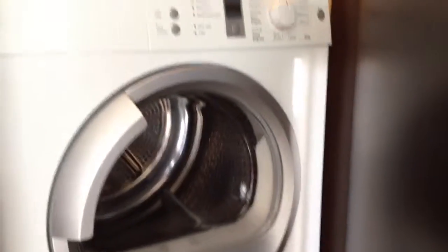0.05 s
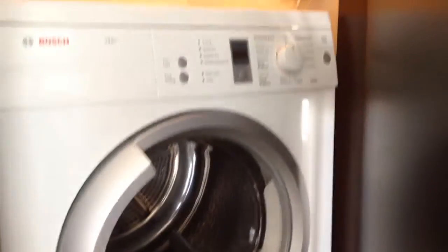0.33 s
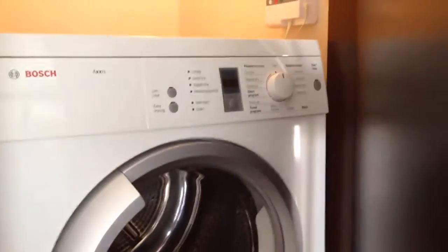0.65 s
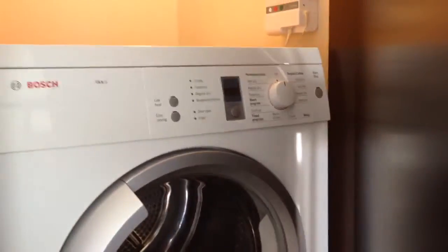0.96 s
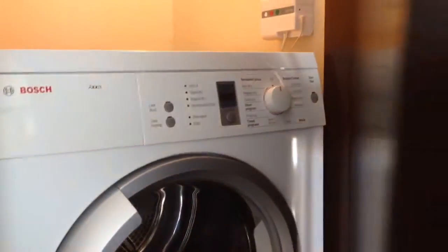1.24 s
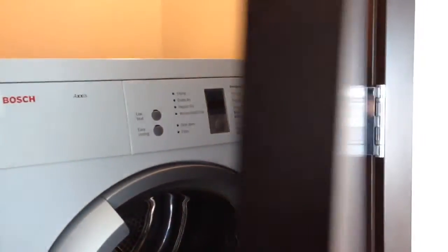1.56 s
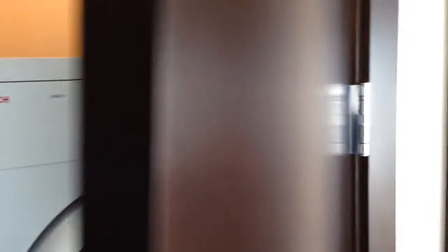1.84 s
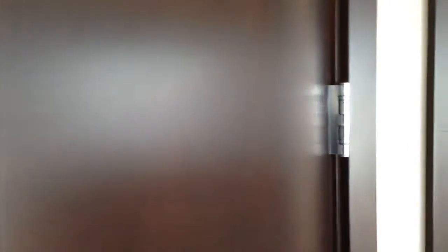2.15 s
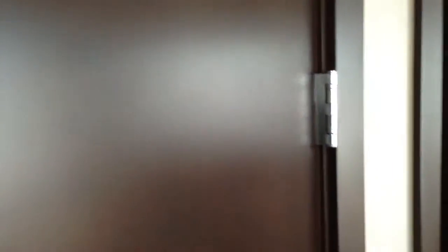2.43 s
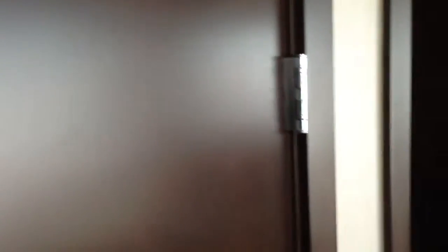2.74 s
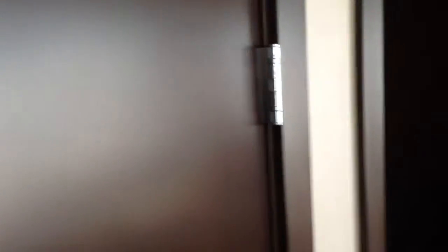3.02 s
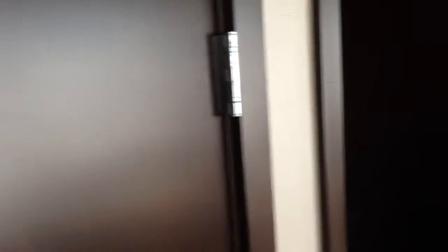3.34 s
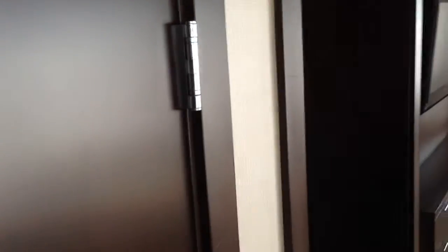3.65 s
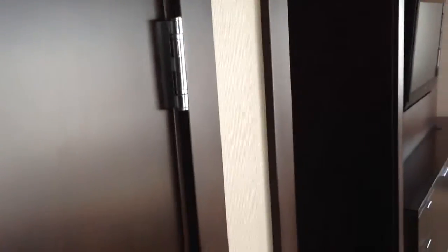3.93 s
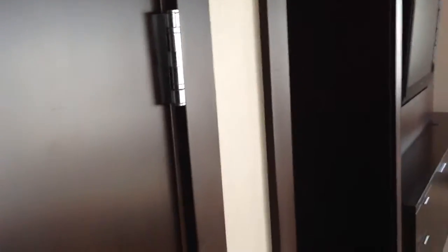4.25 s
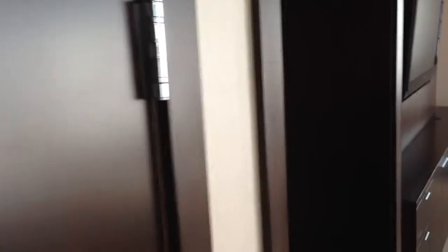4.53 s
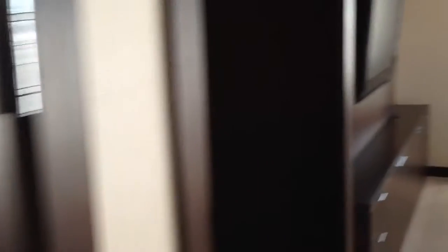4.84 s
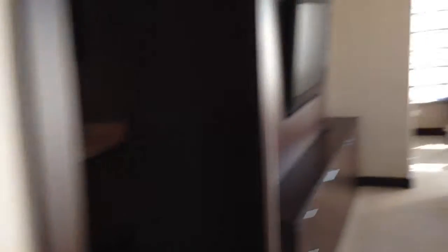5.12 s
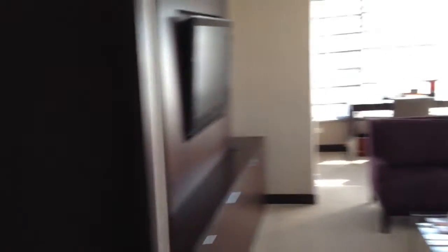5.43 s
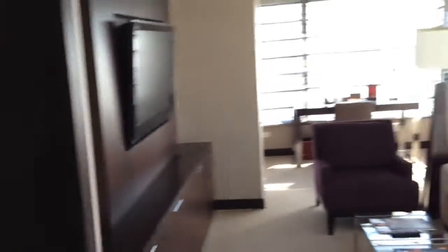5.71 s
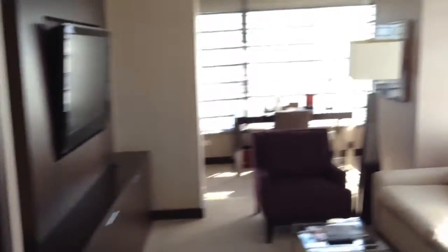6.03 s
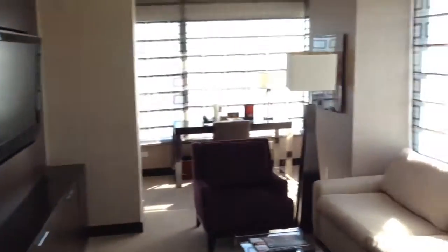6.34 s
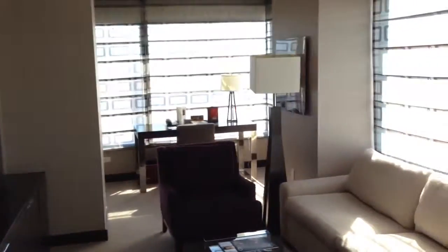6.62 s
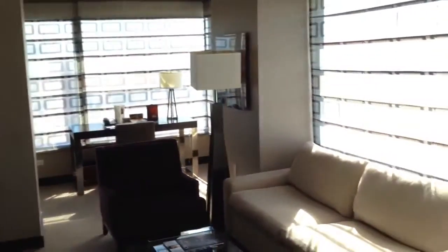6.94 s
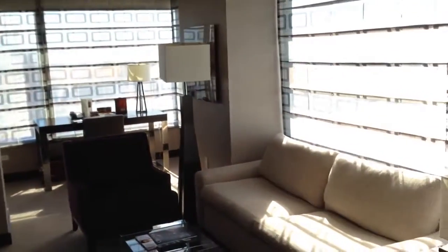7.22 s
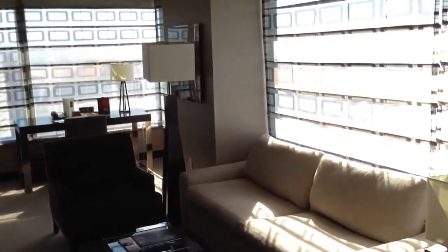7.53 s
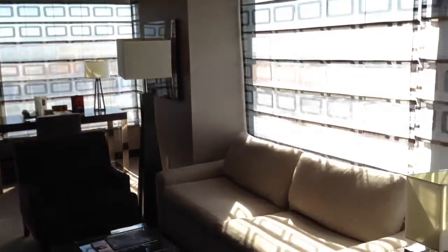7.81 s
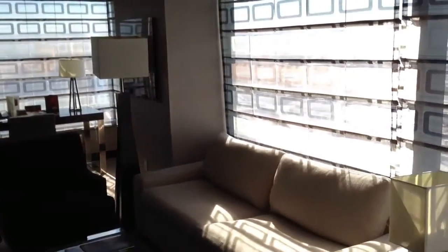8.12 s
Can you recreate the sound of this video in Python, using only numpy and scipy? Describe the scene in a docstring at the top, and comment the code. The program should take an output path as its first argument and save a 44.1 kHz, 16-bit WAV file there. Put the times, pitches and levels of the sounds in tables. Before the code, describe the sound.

A low ventilation rumble with faint hiss fills a quiet, carpeted room. About halfway through, a wooden closet door close to the microphone knocks lightly against its metal catch. After a faint rub, the catch snaps in with a sharp click, and the door thuds shut at once with a deep boom and a brief rattle. The room rings briefly, and only the rumble remains.

```python
"""Closet door pushed shut

A wooden door closes in a quiet, carpeted room with rumbling ventilation and a hissing vent.
It knocks once against its metal catch and rubs over it; the catch snaps in with a sharp click,
echoed by a nearby surface. The leaf thuds into the frame, squeezes the closet's air into a low boom
and rattles briefly. The room rings after each blow."""
import sys
import numpy as np
from scipy import signal
from scipy.fft import rfft, irfft
from scipy.io import wavfile
from scipy.ndimage import uniform_filter1d

SR = 44100
rng = np.random.default_rng(int(sys.argv[2]) if len(sys.argv) > 2 else 0)


def put_to_file(sound):
    """Save the sound as 16-bit audio at rate SR, in the file named by the first command-line argument."""
    columns = np.atleast_2d(sound).T  # one column per channel
    safe = np.clip(columns, -1, 1)
    whole_steps = np.round(safe * 32767)
    wavfile.write(sys.argv[1], SR, whole_steps.astype(np.int16))


N = 364707

# blows on the door leaf: start_s, thump_db, thump_centre_hz, clack_db
BLOWS = [(3.8009, -6, 192, -18), (3.811, -13, 338, -18.5), (3.828, -9, 167, -27), (4.590, -12.5, 316, -15),
         (4.599, -2, 98, -17), (4.606, -20, 228, -11.5), (4.637, -4, 102, -20), (4.655, -20, 292, -31)]


def gain_of(db):
    """Decibels to amplitude."""
    return 10 ** (np.asarray(db) / 20)


def unit(x):
    """Scales to unit energy."""
    return x / np.sqrt(np.sum(x ** 2) + 1e-20)


def read(points, hz):
    """Interpolates (freq_hz, value) points on a log frequency axis."""
    freq_hz, value = np.transpose(points)
    return np.interp(np.log(hz + 1), np.log(freq_hz + 1), value)


def add(mix, start_s, sound):
    """Mixes a sound in at start_s."""
    part = mix[round(start_s * SR):][:len(sound)]
    part += sound[:len(part)]


def noise(spectrum):
    """Steady unit-rms noise coloured by (freq_hz, relative_db) points."""
    colour = gain_of(read(spectrum, np.fft.rfftfreq(N, 1 / SR)))
    return unit(irfft(rfft(rng.standard_normal(N)) * colour, N)) * np.sqrt(N)


def modes(table):
    """One second of decaying sines struck together, unit energy."""
    t = np.arange(SR) / SR
    return unit(sum(gain_of(db - 60 * t / t60_s) * np.sin(2 * np.pi * hz * t) for hz, db, t60_s in table))


def crack(spectrum, t60_s, tilt_db_per_oct=0, size=4096):
    """A contact: a fast-decaying burst of dense vibration, coloured at minimum phase."""
    hz = np.fft.rfftfreq(size, 1 / SR)
    burst = rfft(rng.standard_normal(size) * gain_of(-60 * np.arange(size) / SR / t60_s))
    broad_shape = np.sqrt(uniform_filter1d(abs(burst) ** 2, size=36))
    colour = gain_of(read(spectrum, hz) + tilt_db_per_oct * np.log2(hz + 100))
    log_gain = np.log(colour / broad_shape)  # only the fine ripple stays random
    mirrored = np.r_[log_gain, log_gain[-2:0:-1]]
    minimum_phase = np.exp(np.conj(signal.hilbert(mirrored)))
    return unit(irfft(burst * minimum_phase[:len(hz)]))


def move(start_s, length_s):
    """Progress of a microphone movement, 0 to 1."""
    return np.clip((np.arange(N) / SR - start_s) / length_s, 0, 1)


def room(x, rise_s, spacing=16):
    """Dense reflections of random sign build up, then decay band by band."""
    # room decay: freq_hz, t60_s
    decay = [(60, 0.38), (200, 0.67), (600, 0.61), (1500, 0.52), (2500, 0.39), (4000, 0.38), (7000, 0.24),
             (14000, 0.33)]
    taps = np.zeros(SR)
    slots = np.arange(0, SR - spacing, spacing)
    taps[slots + rng.integers(0, spacing, len(slots))] = rng.choice([-1, 1], len(slots))
    hz, t, bands = signal.stft(taps, SR, nperseg=256)
    tail = signal.istft(bands * gain_of(-60 * t / read(decay, hz)[:, None]), SR)[1]
    tail *= 1 - np.exp(-(np.arange(len(tail)) / SR / rise_s) ** 2)
    return signal.fftconvolve(x, unit(tail))[:N]


def ventilation(rumble_db=-56.5, hiss_db=-68, waver_db=0.72, wall_db=-4, wall_hz=200):
    """Air rumbles in the ducts and drives the room's standing waves, over thin microphone hiss."""
    # duct rumble spectrum: freq_hz, relative_db
    duct = [(12, -39), (22, -19), (39, -11.5), (58, -0.5), (75, -4.5), (110, 0.5), (170, -3.5), (240, -3.5),
            (310, -10), (420, -13.5), (520, -16), (730, -23.5), (1550, -28.5), (2700, -38.5), (6000, -54)]
    # standing waves: pitch_hz, width_hz, doorway_db, step_back_db
    standing = [(165, 18, -77, -57.5), (215.4, 11, -60, -62.5), (376.7, 59.5, -64.5, -65)]
    # microphone hiss spectrum: freq_hz, relative_db
    hiss = [(100, -1.5), (2000, 2.5), (2750, 0), (3600, 3.5), (4900, 2), (8000, 1), (15000, -0.5)]
    stepped = move(start_s=2.8, length_s=0.43)  # one step back from the closet doorway
    turned = move(start_s=5.23, length_s=0.42)  # from the wall to the open room
    waver = noise([(0, 0), (3, 0), (12, -30), (60, -120)])
    air = gain_of(rumble_db) * noise(duct)
    for hz, width_hz, doorway_db, step_back_db in standing:
        wave = signal.lfilter(*signal.iirpeak(hz, hz / width_hz, fs=SR), noise(duct))
        turn_db = wall_db * min(wall_hz / hz, 1) ** 2  # low waves weaken away from the wall
        level_db = doorway_db + (step_back_db - doorway_db) * stepped + turn_db * turned
        air += gain_of(level_db) * unit(wave) * np.sqrt(N)
    return gain_of(waver_db * waver) * air + gain_of(hiss_db) * noise(hiss)


def vent(start_db=-84, rise_db_per_s=0.8):
    """Air hisses through the grille, growing steadily as the microphone comes round to the room."""
    level_db = start_db + rise_db_per_s * np.arange(N) / SR
    hiss = noise([(1500, -26), (2800, -10.5), (3500, -1.5), (4100, -4.5), (5200, -17), (10000, -38)])
    return gain_of(level_db) * hiss


def catch(spring_start_s=3.8, spring_db=-29):
    """The sprung catch snaps: hard tick, short metallic clack, faint ring of the fittings, early echo."""
    # catch clicks, and an early echo of the snap off a nearby surface (4.467 s):
    # start_s, clack_db, tick_db, relative_tilt_db_per_oct
    clicks_and_echo = [(3.795, -27, -45, -2), (3.7995, -17.5, -27, 2.5), (4.4434, -6, -5, -3),
                       (4.4444, -30, -6, 2), (4.467, -18, -37, -6), (4.577, -25, -46, -3),
                       (4.5992, -18.5, -35, 1), (4.63, -34, -47, 4), (4.639, -24, -47, 1),
                       (4.655, -32, -41, 7)]
    # metal click spectrum: freq_hz, relative_db
    metal = [(100, -38), (500, -16), (1050, -14), (1400, -2), (1850, -6.5), (2250, 4), (2800, -6),
             (3500, -1.5), (4600, -4), (6300, -10), (8000, -22.5), (11000, -35), (15000, -35)]
    # damped modes of the catch in the wood: pitch_hz, relative_db, t60_s
    catch_modes = [(720, -14, .09), (1330, -7, .05), (1680, -6, .05), (2090, -1, .045), (2370, -2, .035),
                   (2830, 2, .018), (3480, -1, .022), (4170, -5, .02), (4600, -1, .022), (5100, -7, .02),
                   (5620, -7, .022), (6250, -8, .02), (7200, -13, .015)]
    # ringing of catch and hinges: pitch_hz, relative_db, t60_s
    ring_modes = [(770, -7, .4), (958, -7, .4), (1292, -2, .5), (1362, -2, .4), (1396, -2, .4),
                  (1691, 0, .45), (2068, -1, .4), (2296, 0, .3), (2435, 1, .27), (2929, -1, .22),
                  (3393, 1, .25), (3546, 1, .25), (3774, 2, .15)]
    # the spring, singing as it is loaded: pitch_hz, relative_db, t60_s
    spring_modes = [(1400, 6, 1.1), (1720, 0, 1.8), (2100, 4, 1.2), (2350, -3, 1.6)]
    out, clack, ring = np.zeros(N), modes(catch_modes), modes(ring_modes)
    for start_s, clack_db, tick_db, tilt in clicks_and_echo:
        add(out, start_s, gain_of(tick_db) * crack(metal, t60_s=0.0086, tilt_db_per_oct=tilt - 1.0))
        add(out, start_s, gain_of(clack_db - 0.5) * crack(metal, t60_s=0.029, tilt_db_per_oct=tilt - 1.5))
        add(out, start_s, gain_of(clack_db - 7.5) * clack)
    out += gain_of(-4) * room(out, rise_s=0.0055)
    for start_s, clack_db, _, _ in clicks_and_echo:
        add(out, start_s, gain_of(clack_db - 10) * ring)
    add(out, spring_start_s, gain_of(spring_db) * modes(spring_modes))
    return signal.lfilter(*signal.butter(2, 330, "highpass", fs=SR), out)  # small parts radiate no bass


def booms(swell_s=0.0037):
    """Air squeezed in the closet as the leaf stops swells into a deep, decaying tone."""
    # closet air swings: start_s, pitch_hz, level_db, t60_s
    swings = [(3.800, 49, -8, .28), (4.603, 62.5, .5, .47)]
    out = np.zeros(N)
    swell = 1 - np.exp(-np.arange(SR) / SR / swell_s)
    for start_s, hz, level_db, t60_s in swings:
        add(out, start_s, gain_of(level_db) * unit(modes([(hz, 0, t60_s)]) * swell))
    return out


def thumps():
    """Each blow shakes the leaf; a soft contact favours its lowest modes."""
    # modes of the leaf in its frame: pitch_hz, relative_db, t60_s
    leaf_modes = [(87, -6, .28), (97, 0, .38), (124, -3, .36), (152, 1, .21), (183, -5, .18), (202, 1, .18),
                  (250, -10, .2), (285, -10, .17), (323, -7, .16), (354, -6, .33), (433, -5, .34),
                  (525, -11, .32), (575, -12, .26), (680, -13, .3), (850, -13, .35)]
    out, leaf = np.zeros(N), modes(leaf_modes)
    for start_s, thump_db, centre_hz, _ in BLOWS:
        contact = signal.butter(1, [centre_hz / 1.5, centre_hz * 1.5], "bandpass", fs=SR)
        add(out, start_s, gain_of(thump_db) * unit(signal.lfilter(*contact, leaf)))
    return out + gain_of(-8.5) * room(out, rise_s=0.015)


def clacks():
    """Wood meets wood at the door's edge."""
    # wooden clack spectrum: freq_hz, relative_db
    wood = [(100, -3.5), (300, 9.5), (700, 2.5), (1050, 0.5), (1400, 2.5), (1800, 8.5), (2400, -2),
            (3000, -5), (5000, -35), (8000, -23), (15000, -49)]
    out = np.zeros(N)
    for start_s, _, _, clack_db in BLOWS:
        add(out, start_s, gain_of(clack_db) * crack(wood, t60_s=0.07))
    return out + gain_of(-7) * room(out, rise_s=0.0033)


def rub(rise_share=0.13, fade_db_per_length=-10, grip_db=2):
    """The leaf scrapes unevenly over the catch; each rub takes hold quickly and eases off."""
    # rubs before and after the snap: start_s, length_s, level_db
    rubs = [(4.177, .36, -70), (4.537, 0.039, -46)]
    pressure = np.zeros(N)
    for start_s, length_s, level_db in rubs:
        progress = np.arange(0, 2 * length_s, 1 / SR) / length_s  # fade runs on for a second length
        rise = np.minimum(progress / rise_share, 1) ** 2
        fade_db = fade_db_per_length * np.maximum(progress - rise_share, 0)
        add(pressure, start_s, rise * gain_of(level_db + fade_db))
    grip = noise([(0, 0), (60, 0), (200, -60), (600, -140)])
    friction = noise([(300, -18), (1000, -6), (1600, -2), (2400, -11), (3500, -16), (9000, -39)])
    return pressure * gain_of(grip_db * grip) * friction


def scene():
    """Door and room air at one microphone."""
    return (thumps() + booms() + clacks() + catch() + rub() + ventilation() + vent())[None]


def record(dry):
    """The recorder thins the deepest bass and limits the band."""
    low_hz, high_hz = 30, 15400
    thinned = signal.sosfilt(signal.butter(2, low_hz, "highpass", fs=SR, output="sos"), dry)
    lowpass = signal.firwin(511, high_hz, window=("kaiser", 9), fs=SR)
    return signal.oaconvolve(thinned, lowpass[None], "same")


dry = scene()
out = record(dry)
put_to_file(out)
```